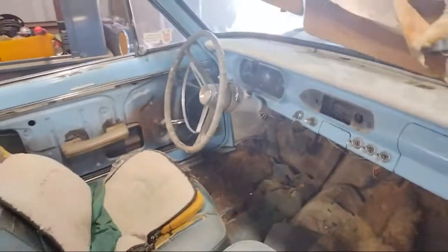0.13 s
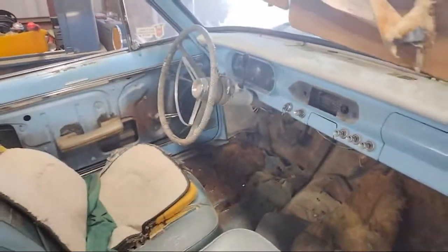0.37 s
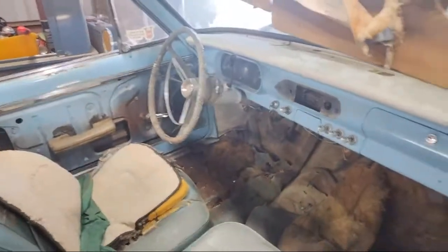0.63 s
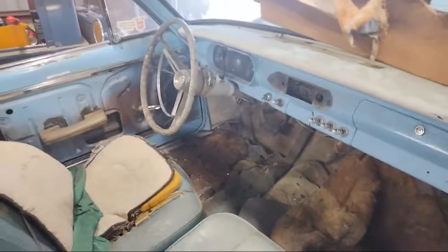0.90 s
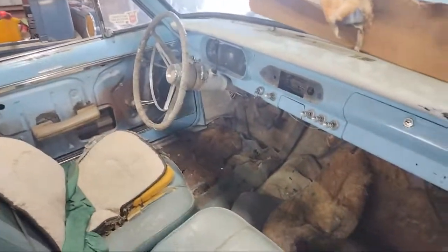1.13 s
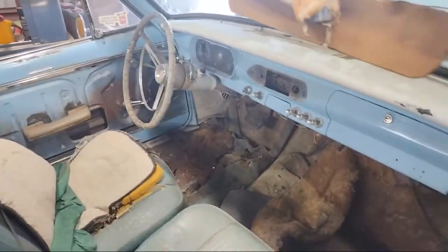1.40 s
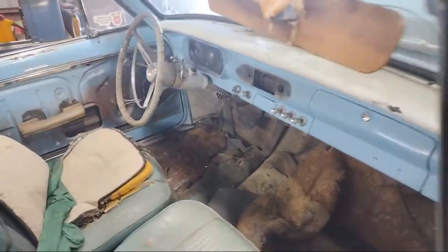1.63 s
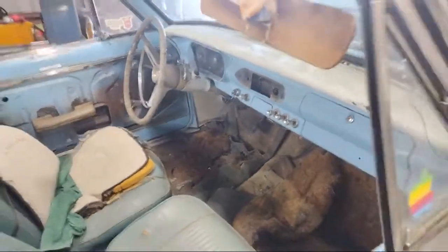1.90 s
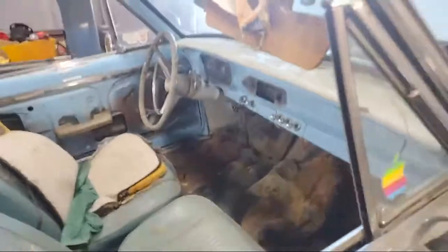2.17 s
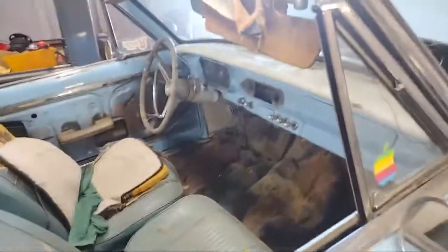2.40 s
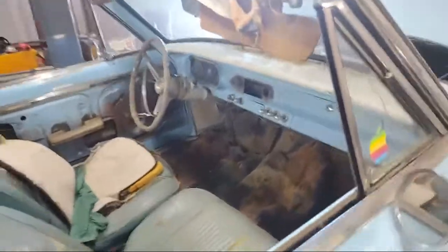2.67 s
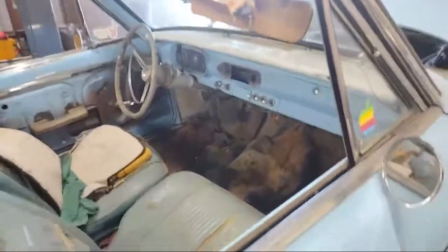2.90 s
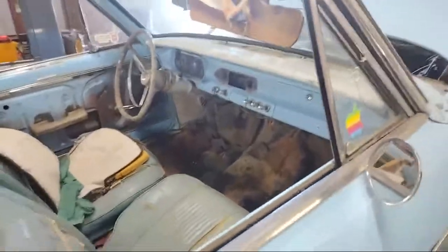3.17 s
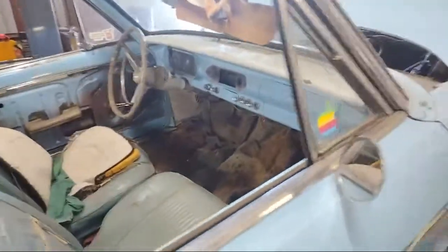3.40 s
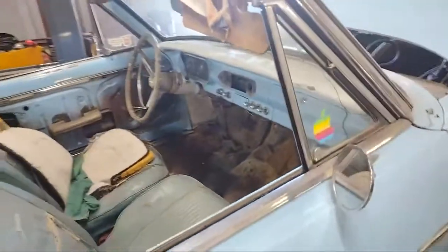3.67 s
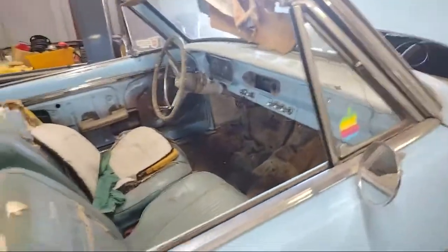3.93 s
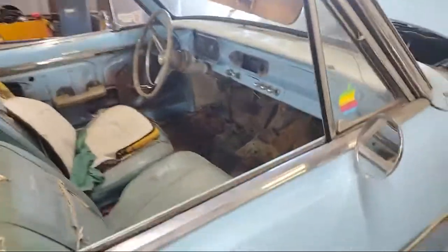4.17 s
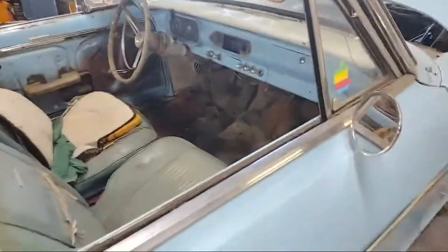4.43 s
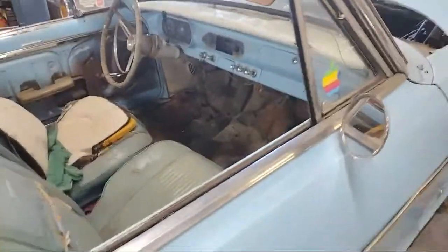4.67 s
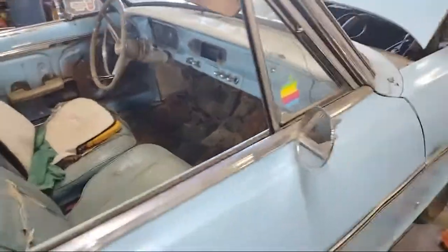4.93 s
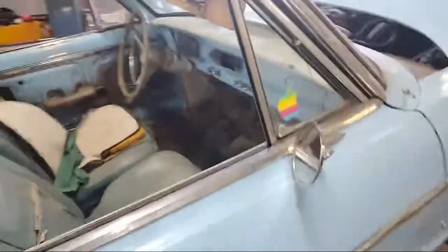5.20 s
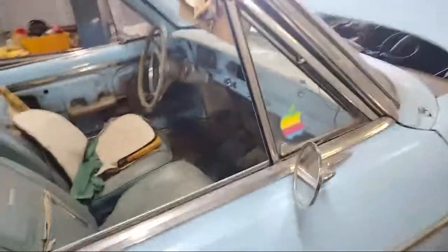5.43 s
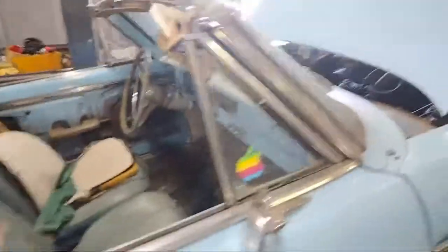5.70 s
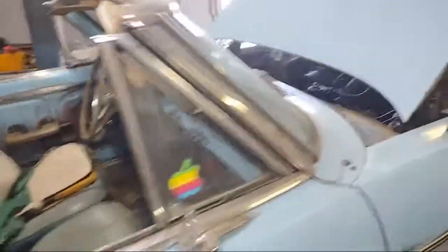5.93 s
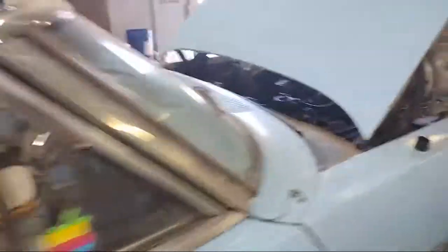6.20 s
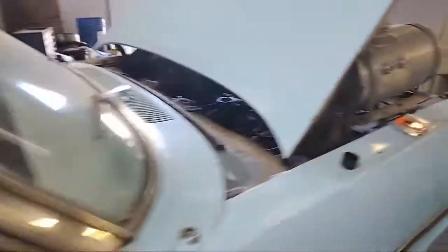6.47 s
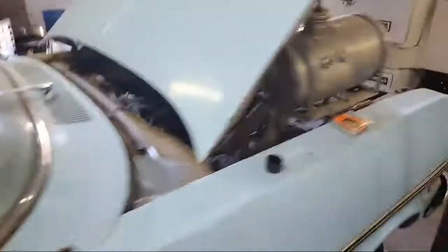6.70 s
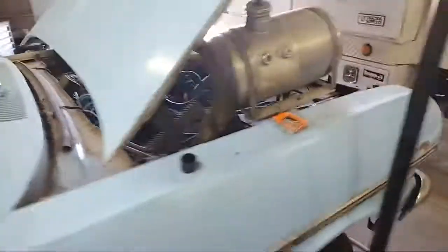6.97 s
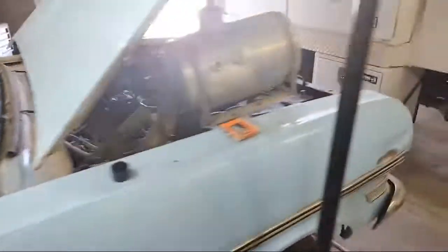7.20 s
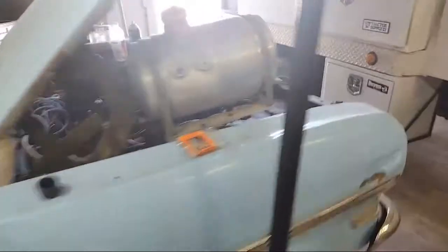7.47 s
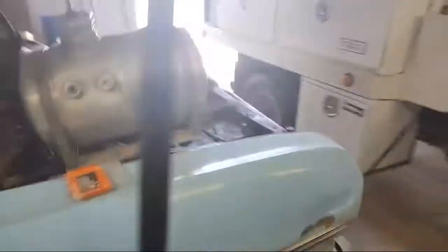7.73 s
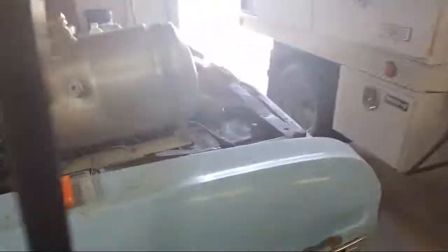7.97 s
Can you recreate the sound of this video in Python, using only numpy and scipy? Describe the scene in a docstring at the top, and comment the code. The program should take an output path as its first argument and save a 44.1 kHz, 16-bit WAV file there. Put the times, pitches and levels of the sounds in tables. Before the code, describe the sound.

In a quiet workshop, someone walks slowly round an old car holding a phone. Fingers rub its shell, with a sharp cluster of knocks right at the start and more strong thumps around two seconds. Then it calms to nearly nothing, before smaller taps and bright ticks amid rustling cloth. Faint shoe scuffs and tiny gritty clicks end it. Very close, dry, mono handling noise over low rumble and faint hiss.

```python
"""First a faint rub of fingers on a phone's shell, soon a burst of knocks: someone walks slowly round
a car in a quiet workshop, the phone in the hand. Rubbing, rustling cloth and scuffing soles are noisy slips
coloured by what is rubbed; rasps are slips through a narrow filter. Knocks ring fading sine tones; short bright
ticks, early ones on the shell and later ones perhaps grit, are short rings and bursts of noise. Under it lie a low
rumble of the moving hand, faint machine tones (sines), and hall rumble and microphone hiss (shaped noise)."""
import sys
import numpy as np
from scipy import signal
from scipy.fft import rfft, irfft, next_fast_len
from scipy.io import wavfile
from scipy.ndimage import uniform_filter1d

SR = 44100
rng = np.random.default_rng(int(sys.argv[2]) if len(sys.argv) > 2 else 0)


def volts(x):
    """Linear amplitude factor 10**(x/20) for a level x in dB, scalar or array-like."""
    e = np.asarray(x, float) / 20
    return 10 ** e


def transcribe(u):
    """Save the signal u as a 16-bit wav file named by the first command-line argument.

    u: samples, shape (n,) or (channels, n), limited to [-1, 1]; the rate is SR.
    q: integer samples, one column per channel.
    """
    v = np.clip(np.atleast_2d(u).T, -1, 1)
    q = np.round(v * 32767).astype(np.int16)
    wavfile.write(sys.argv[1], SR, q)


N = 357077  # length in samples
T = np.arange(N) / SR  # time of each sample in s
SIZE = next_fast_len(N)
HZ = np.maximum(np.arange(SIZE // 2 + 1) * SR / SIZE, 1)  # pitch of each transform bin

# borders of the five friction layers, coarse to fine: [f/Hz]
LAYER_EDGES_HZ = (140, 1050, 2050, 3450, 7750, 20000)
# colours of rubbed shell, hard-pressed shell, cloth, and soles on concrete: [f/Hz, relative level/dB]
SHELL_RUB = [(100, -10.5), (230, 5.5), (900, -8.5), (1200, -7), (2000, -10.5), (3050, -21), (3450, -29.5),
             (6200, -36), (7200, -47.5), (10000, -50.5), (16000, -60)]
PRESSED_RUB = [(100, 8), (200, -8), (300, -2), (900, -8), (2000, -9), (3400, -19), (5000, -21.5),
               (7000, -44), (10000, -52), (16000, -63)]
CLOTH_RUB = [(100, -5), (300, 7.5), (600, 2), (1000, -10.5), (1400, -9), (1800, -5.5), (2200, -9),
             (3000, -13), (4300, -22), (8500, -26), (11000, -27), (16000, -22.5)]
SOLE_RUB = [(100, -3.5), (300, -7), (600, -12), (950, -8), (1400, -3), (1800, 4), (2200, -3), (3000, -13),
            (4300, -27), (8500, -37), (11000, -39), (16000, -35)]
# shell resonances under the fingers, and the hollow colour of folded cloth: [f/Hz, width/Hz, lift/dB]
SHELL_SINGS = [(810, 600, 12.5), (1650, 120, 2), (2700, 310, 3), (4630, 330, 2.5), (5570, 370, 2.5),
               (8600, 990, 4)]
CLOTH_SINGS = [(1366, 290, 9), (1705, 280, 3), (2800, 970, 6.5), (8900, 980, 4.5)]
# the fingers come to rest and cloth takes over; then soles take over from cloth: [from t/s, to t/s]
HAND_STILL_S = (3.1, 5.64)
WALK_OFF_S = (6.33, 6.64)
# drag levels between which a hard press takes over and chokes the shell's singing: [level/dB]
PRESS_DB = (-50, -42)

# steady light rubbing of hand and clothes: [t/s, low drag level/dB, middle rustle level/dB, fine hiss level/dB]
RUBBING = [(0.0, -68.5, -68, -94), (0.45, -63.5, -67, -83.5), (0.56, -63.5, -63.5, -84),
           (1.1, -57.5, -60.5, -81.5), (1.38, -61, -61.5, -85.5), (1.48, -63.5, -61, -89),
           (1.58, -59, -60, -86), (1.95, -59.5, -62.5, -82), (2.15, -65, -72.5, -84),
           (2.45, -66.5, -79.5, -83.5), (2.62, -66.5, -69, -73), (2.96, -68.5, -71.5, -79),
           (3.12, -72, -80, -87.5), (3.3, -70.5, -84, -77), (3.5, -71.5, -79, -84), (3.85, -68, -79.5, -86),
           (4.0, -75.5, -90, -99), (4.4, -73.5, -100, -101), (4.55, -72, -73, -83),
           (5.1, -68.5, -68.5, -79.5), (5.6, -71.5, -75.5, -89.5), (6.0, -72, -69, -90),
           (6.3, -70, -68.5, -79.5), (6.55, -71.5, -70.5, -85.5), (6.8, -73, -73, -85),
           (6.92, -66.5, -75, -75), (7.15, -71.5, -68.5, -83), (7.53, -70, -66, -79.5),
           (7.82, -65, -71, -79), (8.1, -73.5, -67.5, -75.5)]
SCRAPE_SHARE, SCRAPE_DB = 0.49, -2  # scrape lies between rustle and hiss: share of rustle, then offset
FINEST_DB = -5  # the finest layer follows the hiss
# held drags of a finger or sole: [start t/s, length/s, start level/dB, end level/dB, brightness/dB, bite/dB]
DRAGS = [(0.0, 0.091, -59, -59, -2, -12), (0.277, 0.038, -51, -31.5, -1.5, 2.5),
         (0.328, 0.012, -37.5, -42, -6, 1.5), (0.531, 0.13, -55, -60, 1, 3),
         (1.584, 0.27, -55, -51.5, -11, -0.5), (2.056, 0.024, -52.5, -49.5, 6, 8),
         (2.093, 0.014, -31.5, -33.5, -1.5, -0.5), (2.121, 0.008, -56, -53, -10, -9),
         (2.653, 0.13, -64, -62.5, 14.5, -2), (2.799, 0.12, -57, -58, 5, 3.5),
         (3.158, 0.094, -71.5, -64.5, 30, 1), (4.77, 0.036, -61.5, -55.5, 3, 1.5),
         (4.813, 0.035, -53, -48.5, -4, -5.5), (7.873, 0.08, -66, -59.5, -29, 4),
         (7.997, 0.089, -74, -68, 16, -24)]
DRAG_RISE_S, DRAG_FALL_S = 0.011, 0.0098  # for 20 dB
# passing brushes and scuffs; rise and fall span 20 dB:
# [peak t/s, rise/s, fall/s, peak level/dB, brightness/dB, bite/dB]
BRUSHES = [(.22, 0.08, 0.021, -62, -3, -7), (0.321, 0.015, 0.02, -36, 6, 1.5),
           (0.649, 0.012, 0.0079, -52.5, -7, 3), (.705, 0.015, 0.017, -60.5, 11, 5),
           (.733, 0.0081, .02, -71.5, 31, -14), (.825, 0.1, 0.1, -55, -6, -1.5),
           (1.22, 0.088, 0.022, -56, -8, -0.5), (1.33, 0.37, 0.038, -57, -8, 1.5),
           (1.43, 0.05, 0.055, -56, -9, -0.5), (1.548, 0.11, 0.027, -56.5, -11, 0.5),
           (2.011, 0.073, 0.021, -58, -5, -4), (2.467, 0.0078, 0.071, -62.5, 21, 1.5),
           (2.6, 0.014, 0.021, -55.5, -9, -1), (2.729, 0.13, 0.13, -55.5, 2, 5),
           (3.257, 0.054, 0.048, -59, 24.5, 1.5), (3.29, 0.025, 0.18, -69, 21, -3),
           (4.4, 0.021, 0.07, -77, -16, -1), (4.59, 0.024, 0.058, -56.5, -15, -6.5),
           (4.654, 0.0044, 0.013, -59, 9, 4), (4.885, 0.01, 0.0092, -57.5, 3, -5),
           (4.93, 0.039, 0.037, -66, -3, -2), (4.999, 0.039, 0.025, -58, -1, 3),
           (5.038, 0.045, 0.0082, -52, -19, -0.5), (5.203, 0.01, 0.035, -60.5, 1, 0.5),
           (5.245, .04, 0.059, -67.5, -11, 12), (5.308, 0.095, 0.11, -62.5, -10, 7),
           (5.43, 0.07, 0.035, -62, 6, 1), (5.479, 0.065, .02, -58, 2, -5),
           (5.574, 0.017, 0.03, -55, 0, -9), (5.615, 0.017, 0.025, -61, -5, -1),
           (5.989, 0.2, 0.01, -63, -15, 0), (6.08, 0.097, 0.054, -63, -12, 2.5),
           (6.103, 0.013, 0.059, -68.5, 22.5, 3.5), (6.212, 0.014, 0.067, -71, 24.5, 7.5),
           (6.824, 0.01, 0.083, -57, 19, 2), (7.3, 0.14, 0.14, -78.5, -10, 18),
           (7.591, 0.025, 0.051, -54.5, 13.5, -6), (7.662, 0.004, 0.26, -63, 18.5, -7),
           (7.72, 0.11, 0.074, -59.5, 8, 5)]
# the four finer layers against the coarsest, before brightness and bite:
# early light strokes, later light strokes, hard presses: [level/dB per layer]
ON_SHELL_DB = (-7, -10.5, -20, -29.5)
ON_CLOTH_DB = (-3.5, -8, -16.5, -27)
PRESSED_DB = (-4, -7.5, -22, -31.5)
CLOTH_FROM_S = 4.2  # strokes that start later take the settings of cloth and soles
# how much of the brightness each of these layers takes: [share per layer]
BRIGHT_SHARE = (.05, .1, .7, 1.01)
# how much of the bite each takes, mostly the middle ones: one row on the shell, one later: [share per layer]
BITE_SHARE = (.6, 1.26, 0.24, .01), (1.01, 0.65, 0.67, .01)

# a drag catches one narrow resonance and rasps: [start t/s, length/s, f/Hz, width/Hz, level/dB]
RASPS = [(0.515, 0.11, 2650, 300, -78), (0.748, 0.63, 1660, 500, -70.5), (1.104, 0.234, 2700, 400, -78),
         (1.588, 0.15, 2660, 397, -65), (1.6, 0.2, 4840, 200, -85.5), (1.573, 0.22, 5900, 250, -89),
         (1.6, 0.3, 8420, 300, -90), (1.778, 0.08, 2800, 300, -70), (1.802, 0.063, 5300, 400, -79),
         (2.056, 0.014, 560, 250, -44.5), (2.637, 0.071, 2760, 250, -64.5), (2.7, 0.07, 2640, 250, -65.5),
         (2.635, 0.076, 900, 250, -67), (2.785, 0.05, 2650, 250, -65), (2.848, 0.03, 2100, 200, -66),
         (2.93, 0.056, 2700, 400, -78), (2.66, 0.064, 5840, 150, -84), (2.838, 0.083, 2530, 250, -63),
         (2.81, 0.076, 4480, 150, -74), (3.154, .11, 685, 300, -67.5), (3.402, 0.24, 1360, 200, -85),
         (3.62, .25, 2800, 400, -81.5), (4.792, 0.017, 1770, 300, -53.5), (4.756, 0.1, 2730, 350, -73),
         (4.842, 0.012, 1780, 200, -64), (4.872, 0.016, 1800, 150, -65.5), (5.04, .005, 1720, 250, -59.5),
         (5.217, 0.11, 1500, 250, -78), (7.493, 0.11, 1445, 120, -69), (7.7, 0.045, 1650, 200, -64),
         (7.874, 0.014, 1650, 200, -58), (7.915, 0.041, 1357, 100, -60), (7.902, 0.073, 1840, 120, -68),
         (8.013, 0.1, 1470, 150, -63.5)]
RASP_EDGE_S = 0.0076  # fade in and out

# finger knocks on the shell: [t/s, peak level/dB, contact/ms, struck spot f/Hz]
KNOCKS = [(0.2785, -36, 0.82, 500), (0.2857, -32, 0.66, 450), (0.2952, -30, 0.35, 700),
          (0.3017, -33, 0.4, 600), (0.3082, -30, 0.43, 500), (0.3183, -19, 0.12, 1400),
          (0.3187, -22.5, 1.2, 380), (0.3445, -39.5, 0.9, 350), (0.495, -46.5, .3, 1500),
          (0.5925, -39.5, 0.21, 900), (.596, -38, 0.33, 1500), (.645, -41, 0.31, 900),
          (.676, -39, 0.12, 800), (0.694, -43, 0.41, 800), (1.111, -50, 0.42, 700), (1.201, -39.5, 1, 300),
          (1.366, -40, 1.45, 310), (1.5049, -40, 1.5, 312), (1.6587, -33, 1.6, 325),
          (1.763, -26.5, 0.79, 560), (1.7664, -21.5, 1.12, 625), (1.836, -40.5, 0.58, 400),
          (1.973, -52, 0.44, 700), (2.052, -40, 0.72, 500), (2.074, -38, 1, 330), (2.0853, -16, 0.4, 560),
          (2.094, -25.5, 0.43, 800), (2.1011, -28, 0.4, 700), (2.1162, -42, 0.7, 450),
          (2.237, -51.5, 0.35, 700), (2.594, -53, 0.5, 900), (3.161, -51, .5, 700), (3.306, -55, 0.4, 700),
          (4.583, -45.5, 0.37, 403), (4.585, -40, 3.2, 142), (4.609, -37, 0.16, 505),
          (4.627, -52, 0.38, 1500), (4.652, -58, 0.36, 1500), (4.798, -40.5, 0.32, 1700),
          (4.826, -45, 0.81, 400), (4.84, -54, 0.81, 450), (4.9107, -48.5, 0.4, 550),
          (4.984, -51, 1.4, 340), (4.995, -44.5, 0.21, 1500), (5.008, -47, 0.32, 1500),
          (5.0206, -32, 2, 385), (5.0325, -44, 0.36, 1500), (5.443, -46, 0.48, 590), (5.451, -57, 3.1, 243),
          (5.589, -67, 0.98, 390), (6.83, -57, 2.6, 125), (7.58, -59, .3, 1500), (7.596, -52, 0.25, 900),
          (7.609, -60, 0.37, 1000), (7.662, -58, 0.25, 1500), (7.685, -46, 0.31, 1700),
          (7.715, -54, 0.28, 1500), (7.73, -55, 0.39, 1400), (7.793, -53, .4, 1200),
          (7.879, -54, 0.34, 1500)]
# what the shell rings with, before the struck spot weighs it: [f/Hz, relative level/dB, time to fall 60 dB/s]
SHELL_MODES = [(128, -17, 0.059), (263, -0.5, 0.035), (350, -4.5, 0.023), (550, 2.5, 0.025),
               (685, 2, 0.0072), (900, 19, 0.003), (1720, 6, 0.0033), (2600, 10, 0.011), (4280, -27, .006),
               (6000, -24, .005)]
STAY_CYCLES = 1.4  # the fingertip stays and damps the ring to 1/e after this many swings of the spot

# short bright ticks, early ones on the shell with the knocks, later ones perhaps grit:
# [t/s, peak level/dB, f/Hz, top noise against peak/dB, time to fall 60 dB/s]
TICKS = [(0.3184, -30.5, 2230, -12.5, 0.023), (0.414, -57, 2800, -26, 0.016),
         (0.496, -53.5, 2730, -28, 0.014), (0.594, -42.5, 2080, -14, 0.0099),
         (0.6449, -67, 2470, -26, 0.016), (0.677, -46.5, 2090, -13, 0.013), (0.694, -61, 2600, -33, 0.016),
         (0.7074, -62, 2530, -12, 0.016), (0.7307, -66, 2950, -16, 0.016), (0.744, -50.5, 2200, -25, 0.016),
         (0.837, -63, 4500, -20, 0.01), (1.051, -52, 2220, -8, 0.012), (1.082, -62, 5500, -17, 0.01),
         (1.201, -63, 3500, -19, 0.01), (1.366, -56, 2550, -9, 0.022), (1.7632, -35.5, 2210, -34, 0.013),
         (1.763, -42, 4600, -30, 0.0073), (1.7665, -31.5, 2150, -35, 0.01), (2.052, -44, 2390, -23, .012),
         (2.0864, -33.5, 2700, -40, 0.011), (2.592, -53.5, 2550, -27, 0.016), (3.16, -66, 3500, -3, .02),
         (4.5814, -68, 2410, 4, 0.016), (4.611, -37.5, 2080, -16, 0.015), (4.6105, -46, 4300, -30, 0.012),
         (4.627, -51, 2710, -10, 0.0081), (4.678, -46, 3300, -11, 0.023), (4.785, -50, 2320, -27, 0.016),
         (4.85, -42, 2920, -15, 0.0086), (4.9125, -41, 3270, -13, 0.026), (4.84, -54, 3000, -20, 0.01),
         (4.995, -59, 2860, -28, 0.016), (5.021, -52, 2700, -25, 0.016),
         (5.0618, -32.5, 3640, -9.5, 0.0096), (5.0666, -44, 3980, -8, 0.0072),
         (5.445, -39.5, 2300, -37, 0.021), (7.0718, -61, 2770, -20, 0.018), (7.938, -55, 2930, -21, 0.016)]
SWELL_S = 0.015  # noise swells by 60 dB over this time before the tick
LEAD_S = 0.015  # the sharp edge comes this long after the start of the swell
HIGH_TICK_HZ = 2800  # ticks pitched above this count as high
# lower edge of the top noise around a tick: [lower tick f/Hz, high tick f/Hz]
TOP_NOISE_HZ = (7000, 11800)
# how fast the top noise comes and goes against the main noise: [lower tick factor, high tick factor]
TOP_NOISE_FADE = (1.9, 0.5)

# low rumble of the hand while the drag is at DRAG_DB: [t/s, level/dB]
SWAY = [(0, -71.5), (0.9, -75.5), (1.3, -73), (2.2, -69.5), (2.75, -75), (3.4, -71.5), (4.5, -72.5),
        (5.5, -71.5), (6.1, -67.5), (6.8, -70.5), (7.4, -71.5), (8.1, -70.5)]
DRAG_DB, SWAY_FOLLOWS, SWAY_SMOOTH_S = -64, 0.67, 0.019  # dB of rumble per dB of drag over DRAG_DB

# faint machine tones, each heard where the walk passes through it: [f/Hz, level/dB, from t/s, to t/s]
HUM = [(88, -78.5, 5.05, 5.3), (93, -79, 5.6, 6.2), (225, -74.5, 5.65, 6.08), (160, -78, 6.2, 6.7),
       (119, -79.5, 6.95, 7.3), (161, -73, 5.3, 5.6), (125, -74, 7.55, 7.95)]
HUM_FADE_S = 0.1  # before and after those times

# colour of hall rumble and microphone hiss together: [f/Hz, relative level/dB]
HALL = [(15, -61), (30, -28), (80, -17), (280, -8.5), (700, -19.5), (1300, -20.5), (2000, -27.5),
        (4400, -34), (8000, -34), (11500, -36.5), (12300, -32), (16000, -32)]
HALL_DB = -74  # their joint level before the rumble wavers


def shade(points):
    """Turns a colour curve of (Hz, dB) points into a gain for every transform bin."""
    hz, db = np.transpose(points)
    return volts(np.interp(np.log(HZ), np.log(hz), db))


def sings(peaks):
    """Turns resonances of (Hz, width, dB) into a gain for every transform bin."""
    return volts(sum(db / (1 + (2 * (HZ - hz) / width) ** 2) for hz, width, db in peaks))


def unit(spectrum):
    """Turns a spectrum back into sound with an rms of 1."""
    x = irfft(spectrum, SIZE)[:N]
    return x / np.sqrt(np.mean(x ** 2))


def walk(rate):
    """Random levels, each held for 1 / rate seconds, then smoothed twice into a wandering curve."""
    hold = int(SR / rate)
    steps = np.repeat(rng.standard_normal(N // hold + 1), hold)
    return 1.54 * uniform_filter1d(uniform_filter1d(steps, hold), hold)[:N]


def ring(hz, t60):
    """One sine that falls by 60 dB in t60 seconds, cut at 0.06 s."""
    t = T[:int(0.06 * SR)]
    return np.sin(2 * np.pi * hz * t) * np.exp(-np.log(1000) * t / t60)


def add(out, s, x, db):
    """Lays a hit into out from time s, with its peak at db."""
    i = int(s * SR)
    out[i:i + len(x)] += (x * volts(db) / np.abs(x).max())[:N - i]


def friction(gains):
    """Slips excite the shell under moving fingers, then cloth, then soles on concrete, in five layers."""
    colours = (shade(SHELL_RUB) * sings(SHELL_SINGS), shade(CLOTH_RUB) * sings(CLOTH_SINGS),
               shade(SOLE_RUB) * sings(CLOTH_SINGS), shade(PRESSED_RUB))
    resting = np.interp(T, HAND_STILL_S, (0, 1))
    walking = np.interp(T, WALK_OFF_S, (0, 1))
    pressed = np.interp(20 * np.log10(gains[0]), PRESS_DB, (0, 1)) * (1 - resting)
    shares = 1 - resting - pressed, resting - walking, walking, pressed
    stumble_db = 0.75 * walk(30)  # the sliding never runs evenly
    jolts = slips(per_s=700, spread_db=3.0, smooth=0.34)  # the bigger catches shake every layer at once
    out = 0
    for gain, lo_hz, hi_hz in zip(gains, LAYER_EDGES_HZ, LAYER_EDGES_HZ[1:]):
        layer = 1 / np.sqrt((1 + (lo_hz / HZ) ** 12) * (1 + (HZ / hi_hz) ** 12))
        rough = (slips(per_s=2500, spread_db=4.0, smooth=1.03) + 0.41 * jolts) * layer
        mix = sum(share * unit(rough * colour) for share, colour in zip(shares, colours))
        out = out + gain * volts(stumble_db + 0.71 * walk(25)) * mix
    return out


def slips(per_s, spread_db, smooth):
    """Skin or weave catching and letting go: dense tiny slips of uneven size over smooth sliding."""
    catch = rng.random(N)
    size = rng.exponential(size=N)
    slide = rng.standard_normal((2, N))
    grains = (catch < per_s / SR) * volts(spread_db * np.minimum(size, 3)) * slide[0]
    return rfft(grains / grains.std() + smooth * slide[1], SIZE)


def effort():
    """Gains of the five friction layers: the powers of steady rubbing, drags and brushes add up."""
    times, *levels = np.transpose(RUBBING)
    drag, rustle, hiss = (np.interp(T, times, db) for db in levels)
    scrape = SCRAPE_SHARE * rustle + (1 - SCRAPE_SHARE) * hiss + SCRAPE_DB
    power = volts(2 * np.array([drag, rustle, scrape, hiss, hiss + FINEST_DB]))
    for start, length, *rest in DRAGS:
        power += stroke(start, start + length, DRAG_RISE_S, DRAG_FALL_S, *rest)
    for peak, rise, fall, db, *tone in BRUSHES:
        power += stroke(peak, peak, rise, fall, db, db, *tone)
    return np.sqrt(power)


def stroke(start, end, rise, fall, db0, db1, bright_db, bite_db):
    """Power of the five layers for one stroke: it rises, holds from db0 to db1, then falls."""
    corners = start - 3 * rise, start, end + 1e-4, end + 3 * fall
    db = np.interp(T, corners, (db0 - 60, db0, db1, db1 - 60))
    later = int(start > CLOTH_FROM_S)
    layers_db = PRESSED_DB if db1 > PRESS_DB[1] else (ON_SHELL_DB, ON_CLOTH_DB)[later]
    under = np.array(layers_db) + bright_db * np.array(BRIGHT_SHARE) + bite_db * np.array(BITE_SHARE[later])
    return volts(2 * np.r_[0, under])[:, None] * volts(2 * db)


def rasps():
    """Uneven slips through a steep narrow resonance, for as long as the drag holds it."""
    out = np.zeros(N)
    grains = irfft(slips(per_s=2500, spread_db=3.5, smooth=0.9), SIZE)[:N]
    for s, length, hz, width, db in RASPS:
        band = signal.butter(2, (hz - width / 2, hz + width / 2), "band", fs=SR, output="sos")
        x = signal.sosfilt(band, grains)
        corners = s - RASP_EDGE_S, s, s + length, s + length + RASP_EDGE_S
        out += volts(db) * x / x.std() * np.interp(T, corners, (0, 1, 1, 0))
    return out


def knocks():
    """A half-sine push makes the shell ring; a softer fingertip pushes longer and sounds duller."""
    out = np.zeros(N)
    t = T[:int(0.06 * SR)]
    # each knock wakes each mode at a randomly varied level
    varied_db = 4.0 * rng.standard_normal((len(KNOCKS), len(SHELL_MODES)))
    for (s, db, ms, spot_hz), offsets_db in zip(KNOCKS, varied_db):
        body = np.zeros(len(t))
        for (hz, mode_db, t60), offset_db in zip(SHELL_MODES, offsets_db):
            # the struck spot wakes the modes near its own pitch best
            octaves_off = min(abs(np.log2(hz / spot_hz)), 2.5)
            body += volts(mode_db + offset_db - 8.9 * octaves_off) * ring(hz, t60)
        body *= np.exp(-(t * spot_hz / STAY_CYCLES) ** 2)
        push = np.sin(np.linspace(0, np.pi, int(ms * SR / 1000) + 2))
        # the shell gives little low sound: the cut lies below the struck spot, at 280 Hz at most
        light = signal.butter(3, min(spot_hz / 1.3, 280), "high", fs=SR, output="sos")
        add(out, s, signal.sosfilt(light, -np.convolve(push, body)), db)
    return out


def ticks():
    """Noise swells up to one sharp edge that rings a few cycles, then fades, with a band of top noise around it."""
    out = np.zeros(N)
    noises = rng.standard_normal((len(TICKS), 2, int(0.06 * SR)))
    t = T[:noises.shape[2]] - LEAD_S
    for (s, db, hz, top_db, t60), noise in zip(TICKS, noises):
        fade = np.exp(np.log(1000) * np.where(t < 0, t / SWELL_S, -t / t60))
        above = signal.butter(5, hz / 1.45, "high", fs=SR, output="sos")
        below = signal.butter(4, min(hz * 2.1, 12000), fs=SR, output="sos")
        around = np.r_[above, below]
        high = int(hz > HIGH_TICK_HZ)  # high ticks have top noise only above 11.8 kHz
        top = signal.butter(6, TOP_NOISE_HZ[high], "high", fs=SR, output="sos")
        edge = ring(hz, 0.006) + 1.2 * ring(1.166 * hz, 0.0031) + 0.47 * ring(1.46 * hz, 0.0015)
        edge = np.roll(edge, int(LEAD_S * SR))
        add(out, s - LEAD_S, signal.sosfilt(around, 2.6 * edge + noise[0] * fade), db)
        add(out, s - LEAD_S, signal.sosfilt(top, noise[1] * fade ** TOP_NOISE_FADE[high]), db + top_db)
    return out


def sway(drag):
    """The hand's slow movements reach the microphone as a soft low rumble that follows the drag."""
    band = 1 / np.sqrt((1 + (78 / HZ) ** 9) * (1 + (HZ / 150) ** 8))
    drag_db = uniform_filter1d(20 * np.log10(drag), int(SWAY_SMOOTH_S * SR)) - DRAG_DB
    level_db = np.interp(T, *np.transpose(SWAY)) + SWAY_FOLLOWS * np.minimum(drag_db, 14) + 3.4 * walk(6.1)
    return volts(level_db) * unit(rfft(rng.standard_normal(N), SIZE) * band)


def hum():
    """Wavering sine tones of machinery that swell and fade as the phone is carried through the hall."""
    out = np.zeros(N)
    for hz, db, s0, s1 in HUM:
        level = volts(db + 1.3 * walk(3.7)) * np.sqrt(2)  # sqrt(2) turns rms into peak
        phase = 2 * np.pi * np.cumsum(hz * (1 + 0.002 * walk(2.54))) / SR
        heard = np.interp(T, (s0 - HUM_FADE_S, s0, s1, s1 + HUM_FADE_S), (0, 1, 1, 0))
        out += level * np.sin(phase) * heard
    return out


def hall():
    """Distant rumble of the building that wavers a little, and steady microphone hiss above it."""
    air = rfft(rng.standard_normal(N), SIZE) * shade(HALL)
    low = 1 / (1 + (HZ / 1500) ** 4)
    whole = np.sqrt(np.mean(irfft(air, SIZE) ** 2))
    rumble, hiss = (irfft(air * part, SIZE)[:N] / whole for part in (low, 1 - low))
    return volts(HALL_DB) * (rumble * volts(2.4 * walk(3.44)) + hiss)


def scene():
    """All touching sounds lie close to the microphone, so the hall adds only a short faint tail of noise."""
    gains = effort()
    near = friction(gains) + rasps() + knocks() + ticks()
    t = np.arange(int(0.3 * SR)) / SR
    # the tail starts after 4 ms and falls at 60 dB in 0.12 s
    tail = rng.standard_normal(len(t)) * np.exp(-np.log(1000) * t / 0.12) * (t > 0.004)
    echo = signal.fftconvolve(near, tail / np.sqrt(np.sum(tail ** 2)))[:N]
    return (near + volts(-24.5) * echo + sway(gains[0]) + hall() + hum())[None]


def top_cut(x):
    """Nothing passes above the cut-off."""
    return signal.sosfilt(signal.butter(12, 16640, fs=SR, output="sos"), x)


def record(dry):
    """The phone cuts the very top with a steep low-pass filter at 15750 Hz."""
    low_pass = signal.ellip(8, 0.2, 60, 15750, fs=SR, output="sos")
    mix = signal.sosfilt(low_pass, dry)
    return top_cut(mix)


dry = scene()
out = record(dry)
transcribe(out)
```